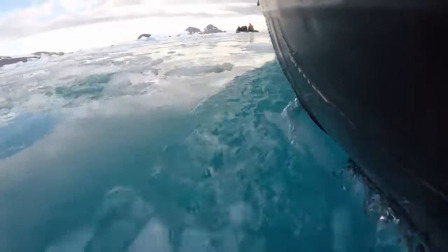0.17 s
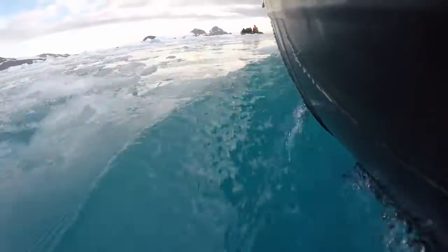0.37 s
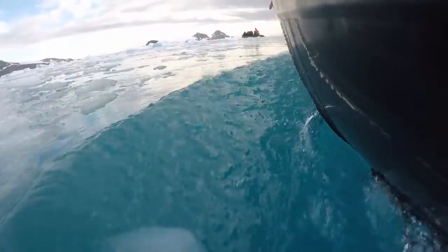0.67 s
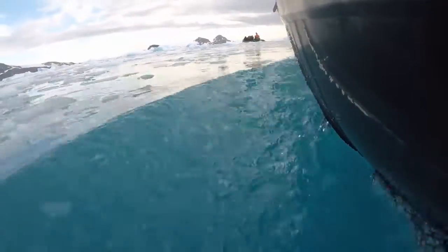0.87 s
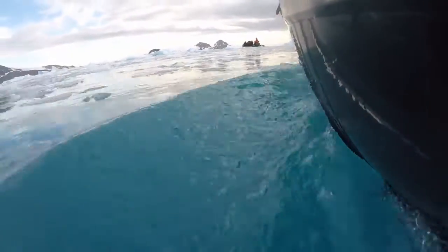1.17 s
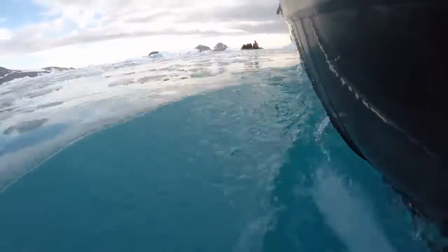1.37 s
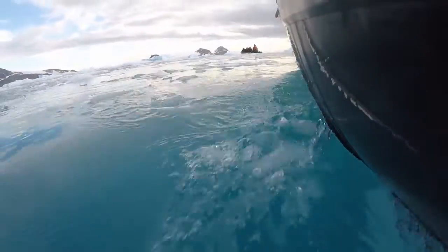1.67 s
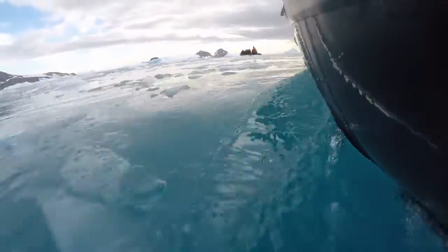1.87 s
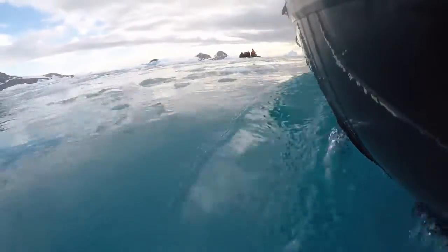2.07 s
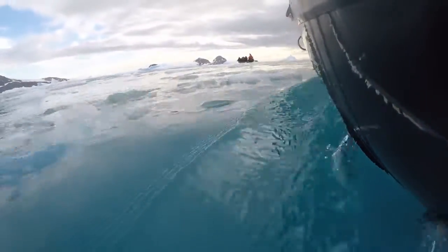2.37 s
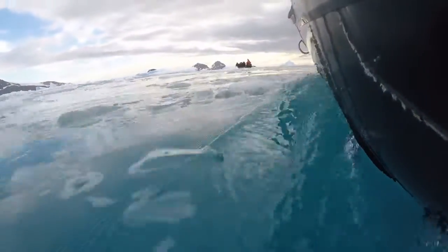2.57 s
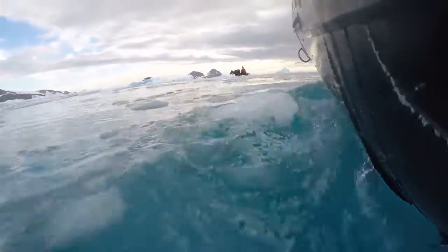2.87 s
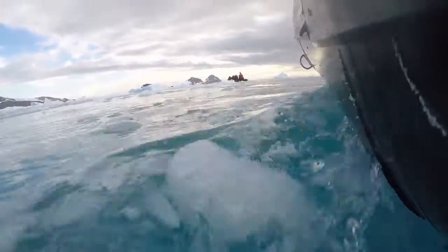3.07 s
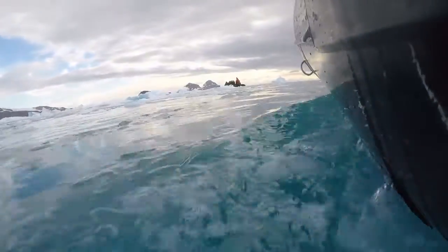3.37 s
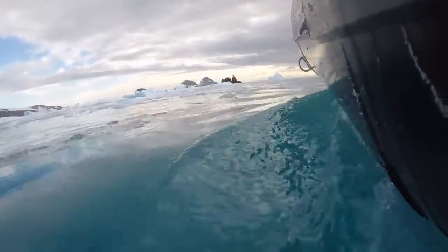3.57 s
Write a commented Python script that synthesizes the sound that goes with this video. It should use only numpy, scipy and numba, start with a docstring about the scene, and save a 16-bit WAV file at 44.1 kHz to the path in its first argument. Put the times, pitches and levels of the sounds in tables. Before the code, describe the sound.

Close, muffled gurgling wash against a moving hull on open icy water, with uneven surges, round bubble plops, faint high droplets and quick slaps, thickening near the end above low rumbling.

```python
"""Icy water along the hull of a small boat, heard close by from inside a muffling waterproof case.
A churning wash leads: flickering noise bands, clumped swarms of ringing bubbles, a smooth far rush.
Over it, decaying sines that rise in pitch make low gulps, loud single bubbles and tiny droplets;
short noise bursts make sharp slaps. Below lies a rumble of lumpy deep noise."""
import sys
import numpy as np
from scipy import signal
from scipy.fft import rfft, irfft, next_fast_len
from scipy.io import wavfile
from numba import njit

SR = 44100
rng = np.random.default_rng(int(sys.argv[2]) if len(sys.argv) > 2 else 0)


def gain_from_db(level_db):
    """Convert decibel levels to linear amplitude factors (20 dB per decade)."""
    decades = np.asarray(level_db, float) / 20
    return 10 ** decades


def wav_record(signal):
    """Record a signal, one row per channel, as 16-bit PCM in the file named by sys.argv[1]."""
    frames = np.transpose(np.atleast_2d(signal))
    bounded = np.clip(frames, -1, 1)
    # unit amplitude maps onto the largest positive 16-bit level
    quanta = np.round(bounded * 32767).astype(np.int16)
    wavfile.write(sys.argv[1], SR, quanta)


N = 164493  # samples


def rms_one(x):
    """Scales to an rms of 1."""
    return x / np.sqrt(np.mean(x ** 2) + 1e-20)


def in_time(rows):
    """Interpolates each column of a table over the scene; column 1 is t/s."""
    t_s, *columns = np.transpose(rows)
    return [np.interp(np.arange(N) / SR, t_s, column) for column in columns]


def drift(rate_hz):
    """Random level of rms 1: noise through a two-pole low-pass, run at SR / 40."""
    hop, settle = 40, 2000  # samples, steps
    pole = np.exp(-2 * np.pi * rate_hz * hop / SR)
    noise = rng.standard_normal(N // hop + settle + 2)
    slow = signal.lfilter([1], [1, -2 * pole, pole * pole], noise)[settle:]
    return np.interp(np.arange(N) / hop, np.arange(len(slow)), rms_one(slow))


def band(x, low_hz, high_hz):
    """Butterworth band-pass."""
    return signal.sosfilt(signal.butter(2, [low_hz, high_hz], "band", fs=SR, output="sos"), x)


def colour(x, points):
    """Minimum-phase filter along a spectrum table, by folding its cepstrum."""
    size = 2 * next_fast_len(N // 2 + 4096)
    hz, level_db = np.transpose(points)
    bin_hz = np.arange(size // 2 + 1) * SR / size
    log_gain = np.interp(np.log(bin_hz + 1), np.log(hz), level_db) * np.log(10) / 20
    cepstrum = irfft(log_gain, size)
    cepstrum[1:size // 2] *= 2
    cepstrum[size // 2 + 1:] = 0
    return irfft(rfft(x, size) * np.exp(rfft(cepstrum)), size)[:N]


# Colour of the water through the case: f/Hz, level/dB (per Hz)
CASE_COLOUR = [(60, -62), (100, 4.5), (150, 4), (285, -5.5), (478, -14.5), (556, -16), (610, -14.5),
               (716, -14), (876, -17), (1280, -17), (1470, -19.5), (1730, -22), (2170, -34.5),
               (2700, -41.5), (4200, -44.5), (4700, -49), (5150, -58.5), (7000, -55), (7700, -57.5),
               (8700, -56), (10000, -65.5), (13000, -79.5), (14500, -93), (16000, -110)]


def through_case(x):
    """The case passes the lows and muffles the treble."""
    return colour(x, CASE_COLOUR)


def case_db(hz):
    """Level of the case colour at a pitch."""
    table_hz, level_db = np.transpose(CASE_COLOUR)
    return np.interp(np.log(hz), np.log(table_hz), level_db)


@njit
def rings(size, start, gain, step, cycles, rise):
    """Each bubble swells briefly, then decays as its pitch climbs; step = cycles per sample."""
    out = np.zeros(size)
    for k in range(len(start)):
        phase, i = 0., start[k]  # phase in cycles
        while phase < 5 * cycles[k] and i < size:
            u = phase / cycles[k]
            envelope = (1 - np.exp(-6 * u)) * np.exp(-u)
            out[i] += 1.5 * gain[k] * envelope * np.sin(2 * np.pi * phase)
            phase += min(step[k] * (1 + rise[k] * phase), .4)
            i += 1
    return out


def hiss(shared):
    """Third-octave noise bands flicker partly together, partly with neighbours, partly alone."""
    edges_hz = 140 * 2 ** np.arange(0, 7, 1 / 3)
    white = rng.standard_normal((2, N))
    out, near = 0, drift(3.7)
    for k, (low_hz, high_hz) in enumerate(zip(edges_hz, edges_hz[1:])):
        near = 0.43 * near + 0.5 * drift(33)  # partly carried over from the band below
        level_db = 2.0 * shared + 1.0 * near + 2.46 * drift(27)
        out = out + gain_from_db(level_db) * band(white[k % 2], low_hz, high_hz)
    return rms_one(out)


def swarm(shared):
    """Bubbles of all sizes are born in clumps; small ones ring high and short."""
    births_per_s = 2600 * gain_from_db(4.5 * shared)
    start = np.flatnonzero(rng.random(N) < births_per_s / SR)
    pitch, loudness, climb, length = rng.random((N, 4))[start].T
    hz = 200 * 60 ** pitch ** .7
    excess_db = 3 * np.minimum(-np.log(loudness + 1e-9), 3.8)
    gain = np.sqrt(hz) * gain_from_db(excess_db) * np.sign(climb - .5)
    cycles = 4.05 * (0.19 + 1.31 * length ** 2) * (hz / 1000) ** 0.41  # decay to 1/e
    rise = 15.2 * climb / (hz + 500)  # share of the pitch, per cycle
    return rms_one(rings(N, start, gain, hz / SR, cycles, rise))


# Wash level over time: t/s, level/dB of the low churn, the churn, the presence band, the treble
CHURN_LEVEL = [(0.02, -53, -30, -41.5, -55.5), (0.39, -22.5, -26.5, -41, -53.5),
               (0.69, -31.5, -33.5, -42.5, -57.5), (0.74, -34, -32.5, -31.5, -54.5),
               (0.78, -35.5, -30, -43, -55.5), (1.1, -24.5, -32, -41, -56.5), (1.61, -33, -26, -38.5, -54),
               (1.64, -20.5, -14, -39, -59), (1.66, -19, -24, -45.5, -57), (1.7, -21, -21, -34, -54),
               (1.82, -11.5, -25, -46, -57), (1.88, -27, -30, -40.5, -52),
               (1.99, -24.5, -27.5, -46.5, -58.5), (2.01, -12, -30, -43, -62),
               (2.05, -25.5, -34, -41.5, -57), (2.39, -22.5, -30, -45, -55.5), (2.43, -36, -30.5, -43, -56),
               (2.91, -20, -28, -39.5, -55.5), (3.04, -29, -23, -38.5, -51.5),
               (3.07, -19.5, -29.5, -36, -55.5), (3.34, -33, -27, -38.5, -52.5),
               (3.47, -21, -26, -38.5, -50.5), (3.69, -19.5, -25, -37.5, -58), (3.71, -21, -27, -43.5, -59)]
# Crossovers between those four ranges: f/Hz
SPLIT_HZ = (420, 2100, 5000)


def wash():
    """Hiss, swarm and smooth far rush in the case colour; four ranges follow their own levels."""
    hiss_db, swarm_db, rush_db = -6.5, -3, -7  # shares of the mix
    shared = 0.13 * drift(6.6) + .7 * drift(30) + .6 * drift(90)
    rush = rms_one(band(rng.standard_normal(N), 2000, 18000))
    mix = gain_from_db(hiss_db) * hiss(shared) + gain_from_db(swarm_db) * swarm(shared) + gain_from_db(rush_db) * rush
    spectrum = rfft(through_case(mix))
    hz = np.arange(len(spectrum)) * SR / N
    below_1, below_2, below_3 = (1 / (1 + (hz / edge) ** 8) for edge in SPLIT_HZ)
    ranges = below_1, below_2 - below_1, below_3 - below_2, 1 - below_3
    out = 0
    for level_db, weight in zip(in_time(CHURN_LEVEL), ranges):
        out = out + gain_from_db(level_db) * rms_one(irfft(spectrum * weight, N))
    return out


def single_bubbles(rows, rise):
    """Rings listed bubbles through the case, its loss at the starting pitch made up."""
    t_s, level_db, hz, cycles = np.transpose(rows)
    start = (t_s * SR).astype(np.int64)
    gain = gain_from_db(level_db - case_db(hz))
    return through_case(rings(N, start, gain, hz / SR, np.maximum(cycles, .3), rise + 0 * t_s))


# Low gulps against the hull: t/s, level/dB, f/Hz (start), decay/cycles
GULPS = [(0.062, -10.5, 141, 1), (0.318, -10.5, 151, 0.47), (0.347, -14, 157, 1.1), (1.035, 1, 153, 0.71),
         (1.327, -23.5, 151, 1.2), (2.238, -9, 170, 1.2), (1.644, -5, 268, 1.7), (1.679, -5.5, 146, 1.2),
         (1.788, -19.5, 150.6, 5.2), (2.006, -5.5, 221, 1.6), (2.629, -7.5, 156, 1.9),
         (2.884, -9.5, 193, 1.15), (2.831, 0.5, 171, 0.43), (2.97, -8, 302, 2.3),
         (3.117, -10.5, 171.3, 5.6), (3.423, -8.5, 334, 1.24), (3.508, 3.5, 169, 0.35)]


def gulps():
    """Large low bubbles; pitch gains 3 % of its start per cycle."""
    return single_bubbles(GULPS, .03)


# Water slaps on the hull or case: t/s, level/dB, f/Hz (lowest), decay/ms
SLAPS = [(0.7468, -10, 1200, 2.6), (0.276, -22, 900, 4), (1.055, -18.5, 1980, 2.7), (1.205, -24, 503, 1.5),
         (1.2618, -19, 1600, 4.2), (1.414, -44, 3030, 1.5), (1.643, -19, 575, 2), (1.701, -30, 2830, 6.4),
         (1.845, -20, 1820, 3), (2.107, -14, 1300, 2.6), (2.146, -19.5, 400, 1.8), (2.186, -16.5, 1000, 2),
         (2.973, -16, 500, 1), (3.027, -12, 600, 1.4), (3.187, -17.5, 595, 4), (3.382, -9.5, 500, 2.7),
         (3.422, -13.5, 396, 4.2), (3.449, -6, 297, 2.3), (3.532, -14, 900, 4.8), (3.651, -29, 2440, 3.7)]


def slaps():
    """Each slap is a sudden noise burst, dying in a few ms, heard through the case."""
    attack_ms, top_hz = 0.66, 15000
    size = 1500  # samples
    t_ms = 1000 * np.arange(size) / SR
    out = np.zeros(N + SR)
    for t_s, level_db, low_hz, decay_ms in SLAPS:
        envelope = (1 - np.exp(-t_ms / attack_ms)) * np.exp(-t_ms / decay_ms)
        burst = band(rng.standard_normal(size) * envelope, low_hz, top_hz)
        gain = gain_from_db(level_db - case_db(low_hz)) * np.sqrt(SR / 2 / low_hz)
        start = int(t_s * SR)
        out[start:start + size] += gain * burst
    return through_case(out[:N])


# Loud single bubbles: t/s, level/dB, f/Hz (start), decay/cycles
PLOPS = [(0.276, -23, 640, 3.2), (0.317, -36, 533, 2.4), (0.336, -12.5, 518, 2.1), (0.466, -25, 635, 13),
         (0.498, -13, 1010, 3.9), (1.04, -9.5, 530, 1.45), (1.126, -19, 826, 5.5), (1.203, -5.5, 790, 1.4),
         (1.335, -15, 633, 2.8), (1.559, -14, 720, 3.1), (1.642, -4.5, 760, 3.2), (1.683, -27, 670, 3.5),
         (1.723, -13.5, 630, 5.1), (1.908, -15.5, 830, 4), (1.991, -15.5, 1115, 4.2),
         (2.211, -16, 486, 2.8), (2.381, -13.5, 636, 1.1), (2.886, -32.5, 643, 2.6), (3.028, -19, 690, 5.4),
         (3.084, -14.5, 1110, 3.6), (3.186, -25, 794, 11), (3.259, -16.5, 980, 6.2),
         (3.382, -6.5, 724, 1.35), (3.421, -7.5, 730, 0.57), (3.478, -7, 726, 1.3), (3.51, -19, 750, 3.8),
         (3.57, -29, 1060, 3.1), (3.591, -14.5, 1220, 3.8), (3.694, -14.5, 710, 1.6),
         (0.2133, -11.5, 1420, 3.1), (0.3842, -19.5, 1900, 7.3), (0.637, -30.5, 2100, 6.4),
         (0.6935, -24, 2200, 30), (0.7372, -16.5, 2000, 11), (0.9732, -19.5, 1676, 19),
         (1.322, -26, 1690, 9.1), (1.5489, -18.5, 1250, 3.8), (1.5697, -12.5, 1260, 5.4),
         (1.632, -16.5, 680, 5.4), (1.7436, -27, 1940, 8.3), (1.7998, -10, 1310, 3.9),
         (2.1415, -22.5, 1450, 4.2), (2.4507, -26, 1650, 9), (2.7021, -21, 1300, 5.8),
         (2.815, -23.5, 1700, 13), (2.867, -20, 1480, 4.5), (2.9746, -17.5, 1730, 9.2),
         (3.4241, -38, 1790, 6.0), (3.5217, -13, 1150, 4.5), (3.6601, -15, 1730, 6.2),
         (0.0385, -21, 2800, 2.7), (0.67, -26, 2140, 10), (3.489, -9, 1010, 3), (1.3119, -30, 4000, 8.5),
         (1.4142, -30, 3750, 6.9), (1.5612, -21.5, 3770, 4.3), (1.747, -31, 2720, 13),
         (1.9125, -25, 4100, 3.7), (2.0083, -33, 3300, 6.8), (2.5067, -30, 4070, 11),
         (2.9686, -38, 3360, 4.4), (3.07, -26.5, 3180, 4.9), (3.1693, -31, 3220, 8.3),
         (3.6394, -29, 3170, 7.4)]


def plops():
    """Mid-sized bubbles; pitch gains 5.5 Hz per cycle."""
    return single_bubbles(PLOPS, 5.5 / np.array(PLOPS)[:, 2])


# Tiny high drops of spray: t/s, level/dB, f/Hz (start), decay/cycles
DROPLETS = [(0.209, -39, 8700, 11), (0.5701, -38, 8600, 8.3), (0.631, -44.5, 6340, 10.0),
            (0.6679, -38.5, 5990, 10.0), (0.7327, -40, 6700, 4.7), (0.742, -33, 6440, 9.4),
            (0.848, -38, 6700, 9.2), (0.9747, -41, 6900, 10.0), (1.072, -41, 5250, 6.7),
            (1.3593, -39, 5700, 9.1), (1.5209, -37.5, 6600, 6.9), (1.8492, -42.5, 7100, 8.9),
            (1.9135, -41, 5870, 8.2), (2.107, -41.5, 6730, 12), (2.4044, -46, 6420, 13),
            (2.5406, -42, 5760, 9.2), (2.598, -40, 8260, 11), (2.603, -36.5, 6700, 14),
            (2.607, -44, 7200, 10.0), (2.7545, -31, 8150, 6.4), (2.941, -38, 6130, 16),
            (3.0061, -44, 5700, 8), (3.019, -38.5, 7360, 7.8), (3.1904, -44, 6960, 6.5),
            (3.4131, -35, 6450, 9.3), (3.5653, -40, 6860, 13)]


def droplets():
    """Tiny high rings; pitch gains 0.25 % of its start per cycle."""
    return single_bubbles(DROPLETS, 0.0025)


# Rumble colour: f/Hz, level/dB (per Hz)
RUMBLE_COLOUR = [(8.8, -41.5), (15, -1.5), (48, -1.5), (81, 1), (166, -7.5), (400, -22.5), (520, -52.5),
                 (880, -120)]
# Rumble level over time: t/s, level/dB, level/dB of the deepest octave
RUMBLE_LEVEL = [(0.02, -13.5, -30), (0.72, -20.5, -23.5), (0.78, -15.5, -33), (1.1, -21.5, -20),
                (1.16, -21.5, -51), (1.25, -14.5, -26), (1.29, -34, -33), (1.33, -15, -44),
                (1.59, -23, -25.5), (1.62, -18, -30), (1.67, -21.5, -16), (1.83, -19, -25),
                (2.18, -20.5, -20), (2.23, -17.5, -34), (2.36, -22.5, -18.5), (2.54, -20.5, -32.5),
                (2.57, -24.5, -53), (2.62, -22, -30), (3.66, -21.5, -28.5), (3.71, -20, -21)]


def rumble():
    """Lumpy deep noise of water and wind on the hull, in two ranges split at 55 Hz."""
    split_hz = 55
    level_db, deep_db = in_time(RUMBLE_LEVEL)
    spectrum = rfft(colour(rng.standard_normal(N), RUMBLE_COLOUR))
    hz = np.arange(len(spectrum)) * SR / N
    deep_weight = 1 / (1 + (hz / split_hz) ** 6)
    upper = rms_one(irfft(spectrum * (1 - deep_weight), N))
    deep = rms_one(irfft(spectrum * deep_weight, N))
    return gain_from_db(level_db + 0.57 * drift(44.0)) * upper + gain_from_db(deep_db) * deep


def scene():
    """Sums all layers into one channel."""
    mix = wash() + gulps() + slaps() + plops() + droplets() + rumble()
    return mix[None]


def top_cut(x):
    """Nothing passes above the cut-off."""
    return signal.sosfilt(signal.butter(12, 14900, fs=SR, output="sos"), x)


def record(dry):
    """Soft saturation rounds the peaks."""
    mix = 1.112 * np.tanh(dry / 1.287)
    return top_cut(mix)


dry = scene()
out = record(dry)
wav_record(out)
```